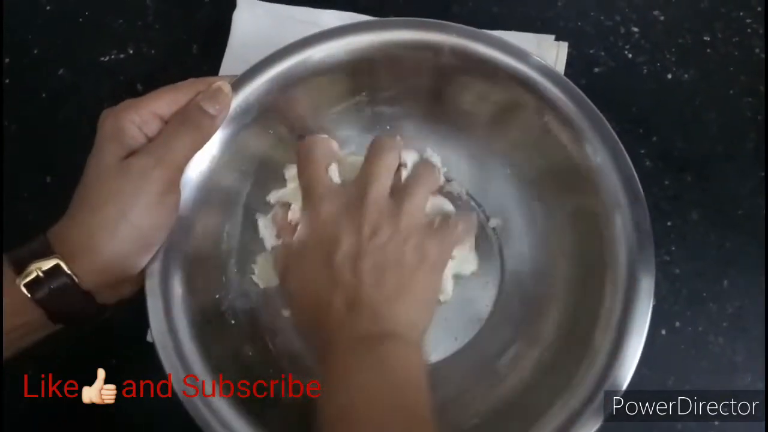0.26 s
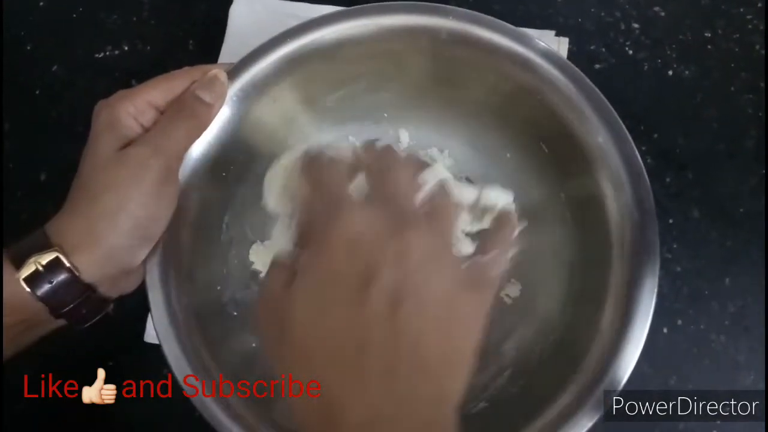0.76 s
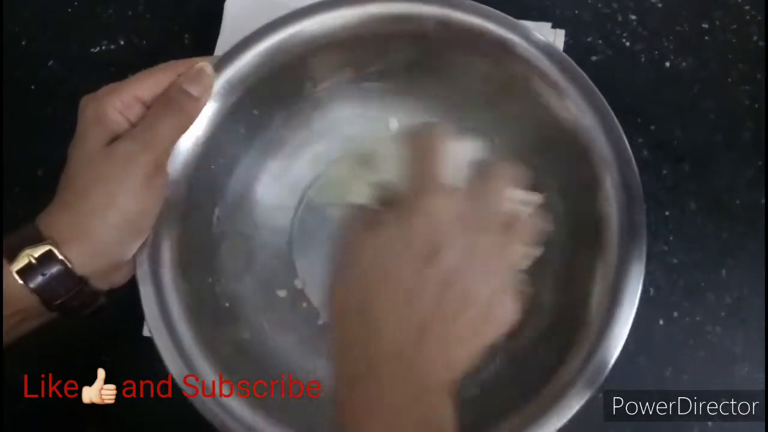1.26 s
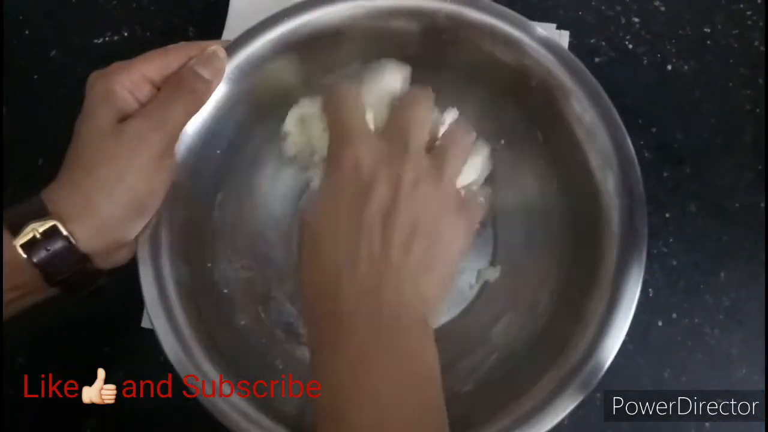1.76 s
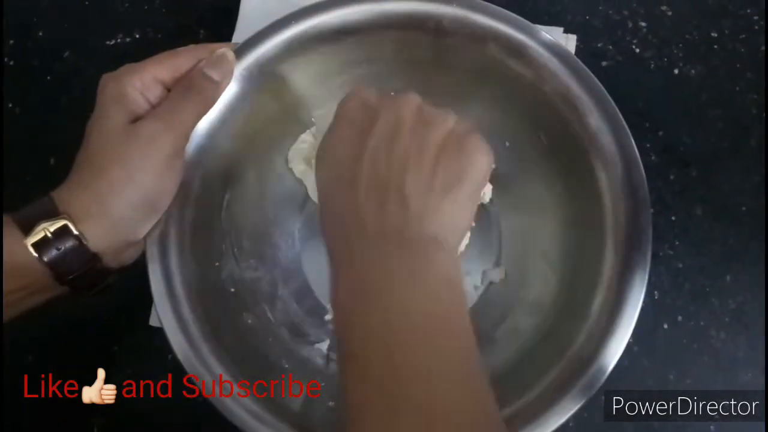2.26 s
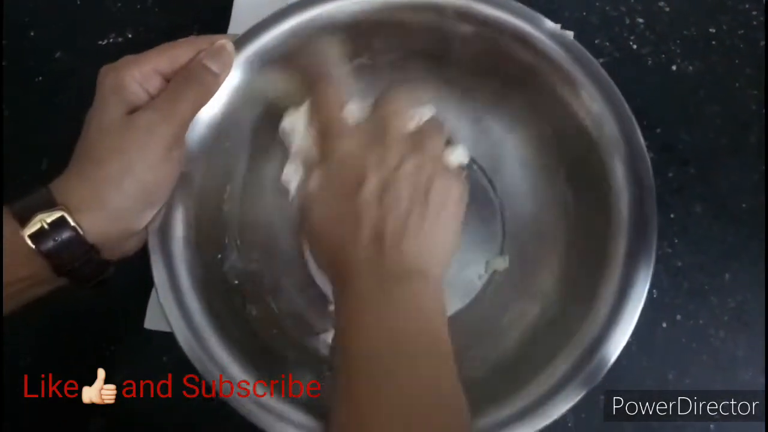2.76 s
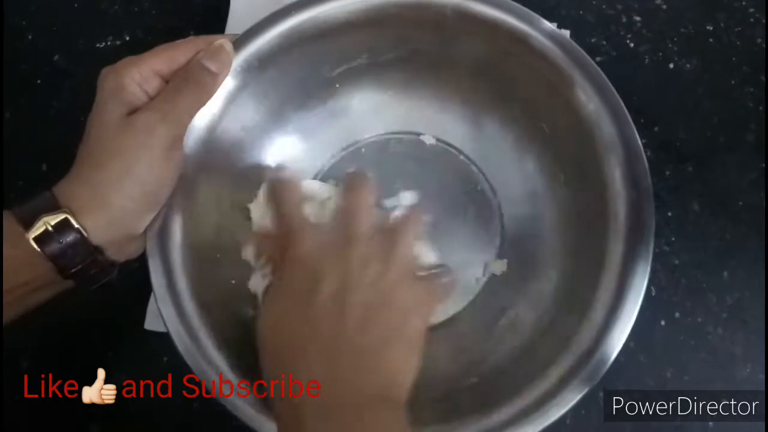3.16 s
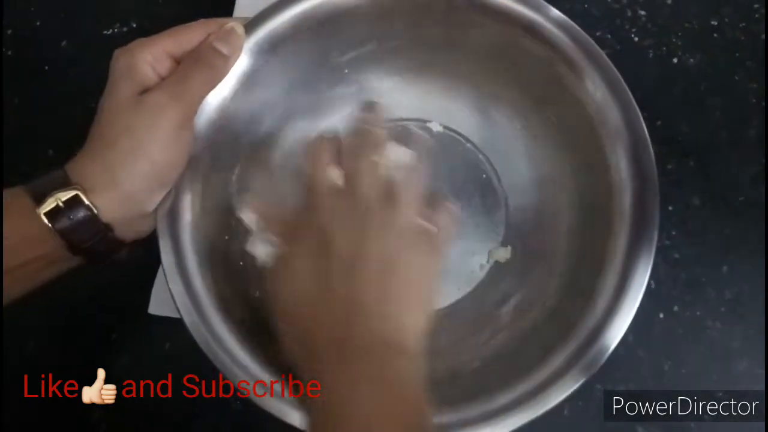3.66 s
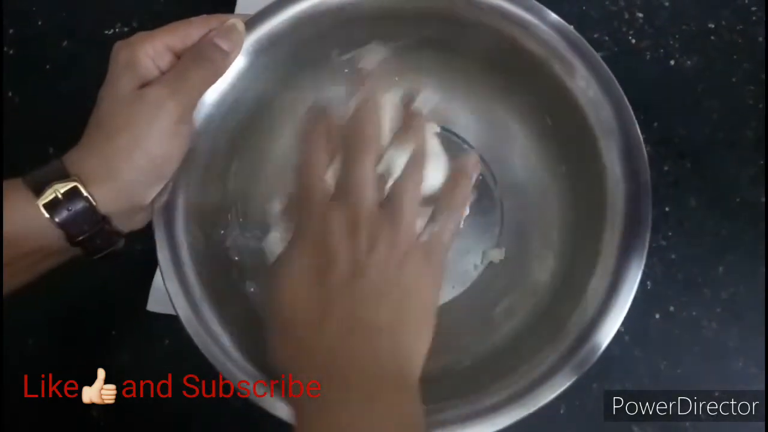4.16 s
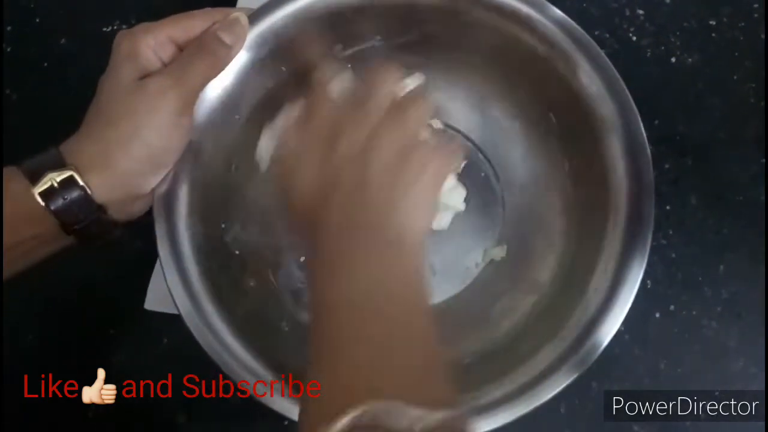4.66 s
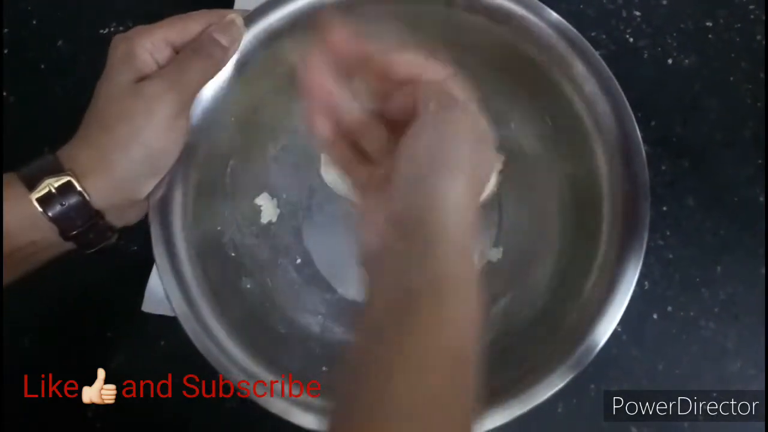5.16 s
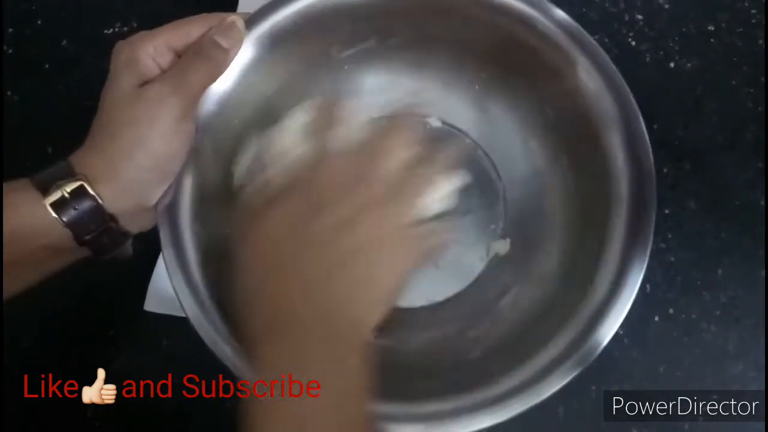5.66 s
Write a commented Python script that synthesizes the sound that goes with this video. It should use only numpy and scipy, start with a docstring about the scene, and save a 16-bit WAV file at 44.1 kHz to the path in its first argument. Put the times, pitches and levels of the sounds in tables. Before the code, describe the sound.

Hands knead sticky dough in a wide steel bowl, with soft rubbing, dull thumps, sticky snaps and hollow metallic knocks in a quiet kitchen.

```python
"""Kneading dough in a steel bowl

Small, quiet kitchen, microphone with two ports close above a wide steel bowl held on a cloth on a counter.
Skin, dough and flour rub as shaped noise; sticky dough snaps and peels in short pops, and skids chirp as sines.
The lump lands with sagging low booms; full and narrow-band knocks are short chatter through the bowl's resonances.
The rim and floor of the bowl ring in decaying modes, and the room adds a short tail, a low hum and a hush."""
import sys
import numpy as np
from scipy import signal
from scipy.fft import rfft, irfft, next_fast_len
from scipy.io import wavfile
from scipy.ndimage import uniform_filter1d

SR = 44100
rng = np.random.default_rng(int(sys.argv[2]) if len(sys.argv) > 2 else 0)


def unload_audio(sound):
    """Save the sound as a 16-bit wav file, at the path given as the first command line argument."""
    columns = np.transpose(np.atleast_2d(sound))
    # keep every value between -1 and 1, then stretch to whole-number steps
    steps = np.round(np.clip(columns, -1, 1) * 32767)
    wavfile.write(sys.argv[1], SR, steps.astype(np.int16))


N = 260190
TIME = np.arange(N) / SR
STEPS = TIME[::32]  # the hand's gestures are drawn at this coarser rate

# Strokes of the hand over the bowl; rise and fade each span 20 dB, levels are before the mix of the rubs:
# peak_s, rise_s, fade_s, skin_on_steel_db, dough_against_skin_db, flour_against_skin_db
HAND_STROKES = [(0, .05, 0.089, -47.5, -11, -28), (0.209, 0.018, 0.28, -62.5, -5.5, -14),
                (0.346, 0.075, 0.16, -44, -9.5, -38), (.5, 0.35, 0.35, -46, -39, -27.5),
                (0.658, 0.086, 0.2, -39.5, -7, -20.5), (.865, 0.025, 0.13, -51.5, -15, -45),
                (1.075, 0.082, 0.3, -41, -2.5, -33), (1.304, 0.12, 0.0099, -43, -16, -22),
                (1.582, 0.23, 0.38, -37.5, -5.5, -21), (1.725, 0.052, 0.043, -43, 6, -40),
                (1.815, 0.05, 0.056, -42, -13, -28), (1.945, 0.088, 0.048, -48.5, -13, -16),
                (2.266, 0.015, 0.065, -44.5, -9.5, -31), (2.452, 0.063, 0.058, -51, -13, -24),
                (2.636, 0.03, 0.21, -43.5, -9.5, -16.5), (2.85, 0.28, 1, -48.5, -24, -26),
                (3.013, 0.05, 0.088, -39, -7, -16.5), (3.167, 0.0068, .15, -73, -30, -33.5),
                (3.427, 0.046, 0.097, -46.5, 2, -20), (3.529, 0.031, 0.12, -45.5, -12, -20.5),
                (3.615, 0.072, 0.28, -53, -1, -43), (3.83, 0.097, 0.49, -47, -8, -20),
                (4.104, 0.063, 0.17, -40.5, -7.5, -17.5), (4.189, 0.019, 0.081, -40, -4, -20.5),
                (4.539, 0.0089, 0.076, -50.5, -19, -34), (4.649, 0.063, 0.15, -47.5, -2.5, -21),
                (4.792, 0.082, 0.083, -39.5, -7, -20), (4.92, 0.043, 0.039, -35.5, -9.5, -23),
                (5.071, 0.053, 0.054, -54, -23, -23), (5.283, 0.0088, 0.14, -46.5, -13, -29),
                (5.49, 0.04, 0.068, -56.5, -45, -34), (5.70, 0.045, 0.51, -42.5, -4, -18.5),
                (5.815, 0.043, 0.058, -28, -5, -23.5)]
# Fingertips and sticky dough snap on the steel: start_s, level_db, pitch_hz, length_s
STICKY_TICKS = [(0.213, -45, 4470, 0.00013), (0.238, -43.5, 4100, 0.00064), (0.627, -26.5, 3970, 0.00066),
                (0.633, -29, 3970, 0.0016), (0.84, -40.5, 4070, 0.0014), (0.877, -36, 4260, 0.0024),
                (0.89, -35, 3770, 0.0024), (1.034, -21, 3700, .001), (1.598, -27, 4100, 0.00092),
                (2.007, -32.5, 3790, 0.0046), (2.635, -32, 3800, 0.00066), (2.64, -32, 4530, 0.002),
                (2.646, -28, 4380, 0.0018), (3, -40, 4630, .002), (3.162, -26.5, 4390, 0.0018),
                (3.425, -29, 4130, 0.00086), (3.518, -36.5, 3950, 0.0014), (3.81, -49, 4200, .001),
                (4.534, -39.5, 3430, 0.0014), (4.629, -27, 4360, 0.0026), (4.647, -20, 4090, 0.001),
                (4.651, -24, 4360, 0.0015), (4.912, -28, 4040, 0.00099), (5.084, -39, 4000, 0.00056),
                (5.678, -27, 4520, 0.00023), (5.683, -14, 4170, 0.00071)]
# Sticky dough peels off the steel in a crackle, level before the bowl's resonances:
# hardest_pull_s, rise_s, fade_s, level_db, middle_grain_pitch_hz
DOUGH_PEELS = [(0.339, 0.025, 0.16, -45, 2470), (.39, 0.058, 0.035, -59, 1540),
               (.66, 0.042, 0.056, -48.5, 1450), (1.075, 0.045, 0.074, -36, 2350),
               (1.1, 0.061, 0.2, -49.5, 924), (1.18, 0.047, 0.06, -48, 1840),
               (1.491, 0.035, 0.15, -57, 2010), (1.734, .04, 0.05, -43, 785),
               (1.81, 0.046, 0.092, -52, 1820), (2.699, .03, 0.13, -50, 2430),
               (2.899, 0.11, 0.13, -56.5, 1550), (3.305, .04, 0.14, -44, 724),
               (3.31, 0.038, 0.18, -48, 1970), (3.43, .03, 0.088, -56.5, 590),
               (3.605, 0.028, 0.051, -57, 670), (3.829, 0.053, 0.09, -50, 553),
               (4.29, 0.028, 0.08, -54, 577), (5.349, .05, 0.04, -62.5, 646)]
# A finger skids and the steel chirps: loudest_s, peak_db, pitch_hz, bell_spread_s (standard deviation)
SKID_CHIRPS = [(0.364, -51, 874, 0.0043), (0.605, -48, 885, 0.0052), (0.641, -48, 905, 0.014),
               (2.649, -58, 1655, 0.0093), (4.795, -59, 855, 0.016), (5.691, -52, 4270, 0.0017),
               (5.695, -42.5, 813, 0.013), (5.721, -32.5, 4070, 0.0034), (5.735, -36, 3760, .004),
               (5.807, -25, 3860, 0.0029), (5.81, -15.5, 4210, 0.0007), (5.8177, -17, 4240, 0.0013)]
# The lump lands or is punched down, then rolls on under the hand; rumble before ROLL_DB, sign of the fade ignored:
# start_s, peak_db, middle_pitch_hz, time_to_peak_s, rumble_db, rumble_fade_by_20_db_s
LUMP_THUMPS = [(0.515, -57, 144, .014, -70.5, -0.5), (0.59, -52.5, 131, 0.012, -91, 6),
               (1.029, -41.5, 153, 0.0053, -58.5, 0.75), (1.462, -44, 137, 0.0086, -56, 0.47),
               (1.494, -46, 160, 0.0096, -68, -0.3), (1.549, -48, 150, 0.0083, -77, -0.3),
               (1.735, -49, 136, 0.0049, -73, 1), (1.928, -43.5, 105, 0.008, -50, 0.16),
               (2.259, -36, 144, 0.0088, -47.5, 0.32), (2.72, -49.5, 127, .01, -56, 0.1),
               (3.013, -53, 138, 0.0069, -52, 0), (3.295, -49, 185, 0.009, -56.5, 0.6),
               (4.128, -58, 162, 0.01, -69, .1), (4.248, -38, 200, 0.0061, -51, 0.15),
               (4.641, -33, 148, 0.0051, -42, 0.03), (4.668, -41, 166, .009, -45, -0.02),
               (4.695, -40, 191, 0.0098, -58, -0.9), (4.792, -47.5, 146, 0.012, -68, -0.5),
               (4.92, -39, 130.4, 0.0063, -50, -0.4), (5.279, -29, 123, 0.0087, -43.5, 0.32),
               (5.673, -42.5, 156, 0.01, -65.5, 2)]
# Narrow-band knocks, alone or together with a bowl knock: time_s, strength_db, middle_pitch_hz, contact_s
NARROW_KNOCKS = [(.659, -3, 1140, 0.0022), (0.84, -9, 1200, 0.0038), (.858, -2, 1100, 0.00087),
                 (1.144, 4.5, 1460, 0.0034), (1.174, 11, 1880, 0.0015), (1.442, 14, 1520, 0.0023),
                 (1.709, 9, 800, 0.0016), (1.74, 7, 910, 0.0057), (1.937, 6, 1450, 0.0025),
                 (2.692, 2.5, 755, 0.0024), (2.78, 1.5, 1070, 0.0015), (2.890, 1, 1500, .0012),
                 (2.921, -0.5, 960, .0012), (3.0163, 12.5, 900, 0.0015), (3.576, 7, 780, 0.0016),
                 (4.131, 12.5, 960, 0.0078), (4.2514, 11, 730, 0.0011), (4.63, 6, 910, 0.0019),
                 (4.926, 2, 1650, 0.0032), (5.671, -2, 770, 0.005), (5.682, 3.5, 765, 0.0052),
                 (5.817, 4, 1020, 0.0034)]
# The bowl knocks on the counter: time_s, strength_db, brightness_db_per_octave, weight_behind_db, contact_s
BOWL_KNOCKS = [(1.035, 5.5, 2.5, 0.5, 0.0029), (1.304, -5.5, 1, -14, 0.0028), (1.442, -8, 2.5, -9, 0.0049),
               (1.5966, 4, -0.3, -9.5, 0.0034), (1.684, -0.5, 2.5, -5, 0.0037),
               (1.708, 5.5, -5, -20, 0.0018), (1.717, -1, 0, -13, 0.0011), (1.739, 1, -2.5, -25, 0.0029),
               (1.751, -7, -3, -23, 0.0017), (1.935, 2, 0.5, 3, 0.0044), (2.2555, -19, -0.5, -18, 0.02),
               (3.2574, 13, -1, -11.5, 0.0027), (3.271, -17, 1, -21, 0.0013),
               (3.292, -9, -5, -1.5, 0.00075), (3.314, -14, -1, -8, 0.0019), (3.576, -2, -1.5, -16, 0.0029),
               (3.635, -9, -1, -4.5, 0.0035), (3.757, 0, 0, -7.5, 0.0022), (3.819, -14, 1.5, -6, 0.0032),
               (4.131, -12, -4.5, -6, 0.004), (4.2513, 6.5, -1, -3, 0.0043), (4.267, -3.5, -2, -8, 0.0018),
               (4.534, -19, 3.5, -21, 0.002), (4.63, -5.5, -2.5, -11.5, 0.0016),
               (4.648, 1, -0.5, -12, 0.0074), (4.91, -12.5, -3.5, 9.5, 0.003), (4.922, -2.5, 1, 1, 0.0029),
               (5.275, -18.5, -12, -6, .0025), (5.670, -7.5, -4.5, 7, 0.0035), (5.685, -2, -0.5, 2, 0.0045)]
# The hand's weight flexes the bowl's floor with a hollow clunk: start_s, peak_db, pitch_hz, time_to_peak_s
FLOOR_CLUNKS = [(1.439, -31.5, 346, 0.0036), (1.458, -44.5, 325, 0.011), (1.595, -32, 452, 0.0024),
                (1.932, -31.5, 374, 0.0034), (2.252, -53.5, 618, .007), (2.282, -49.5, 315, .013),
                (3.015, -40.5, 423, 0.003), (4.2498, -27, 373, 0.0029), (4.672, -42.5, 290, 0.012),
                (4.908, -35.5, 399, 0.003), (5.272, -47, 325, 0.0054), (5.274, -49, 633, 0.0069)]
# Broad resonances and dips of the damped bowl: centre_hz, width_hz, gain_db
BOWL_BODY = [(267, 69, -4.5), (342, 97, 5), (405, 34, 4), (730, 180, -1), (855, 112, 4), (1100, 68, -2.5),
             (1309, 21, 6), (1587, 41, 7.5), (2292, 237, 4.5), (3054, 73, 2.5), (4230, 970, 5)]
# Modes of the floor of the bowl: pitch_hz, relative_db, t60_s
BOWL_FLOOR_MODES = [(107, -9, .4), (198, -14, 0.35), (323, -16, 0.22), (433, -16, .2), (478, -19, .2),
                    (537, -12, .25), (618, -14, .25), (679, -14, .25), (739, -11, .22), (822, -12, .25),
                    (885, -17, .2), (980, -19, .18), (1555, -16, .13), (2330, -21, .12), (2460, -15, .15)]
# Thin modes of the free rim: pitch_hz, relative_db, t60_s
RIM_MODES = [(2326, -26, 1.2), (2487, -23, 1.2), (2630, -15, 2.4), (2676, -15, 2.4), (2864, -19, 1.8),
             (3155, -21, .8), (3311, -24, 1.2), (3714, -21, 1.1), (3785, -21, .9), (3990, -19, 1.3),
             (4081, -21, 1.2), (4164, -20, .8), (4375, -23, .9), (4432, -18, .9), (4560, -25, .8),
             (4710, -23, 1.2), (4860, -24, 1), (5204, -23, .6)]
# Spectrum of skin sliding on steel: frequency_hz, relative_density_db (per Hz)
SKIN_SPECTRUM = [(300, -48.5), (900, -33), (1900, -31), (2450, -4.5), (3100, -2.5), (3800, 2), (4450, 2),
                 (5100, -1.5), (6200, -11), (7500, -25), (9000, -51), (12000, -52)]
# Spectrum of dough dragging on steel: frequency_hz, relative_density_db (per Hz)
DOUGH_SPECTRUM = [(40, -36), (120, -22.5), (300, -0.5), (550, -6.5), (850, 0), (1200, -2.5), (1800, 0),
                  (2700, 5.5), (4000, -4), (7000, -41), (12000, -61)]
# Spectrum of flour hissing: frequency_hz, relative_density_db (per Hz)
FLOUR_SPECTRUM = [(4000, -20.5), (6000, 15), (7500, 8.5), (8800, -2.5), (10500, -4), (13000, -2),
                  (15500, -4)]
# Spectrum of the rumble under the hand's weight: frequency_hz, relative_density_db (per Hz)
RUMBLE_SPECTRUM = [(25, -13), (50, -9), (75, 1), (110, 1.5), (160, 2.5), (230, 1), (380, -15.5),
                   (600, -28.5), (1500, -60)]
# Spectrum shared by every full and narrow-band knock: frequency_hz, relative_density_db (per Hz)
KNOCK_SPECTRUM = [(30, -17), (150, -16.5), (300, 4), (420, 1.5), (820, -1.5), (1120, -3.5), (2050, -8.5),
                  (2500, -1), (3200, -4.5), (4000, 0), (4900, -10), (7500, -29), (12000, -62)]
# Spectrum of the room's hush: frequency_hz, relative_density_db (per Hz)
HUSH_SPECTRUM = [(20, -9), (50, -2.5), (110, 8.5), (220, -4.5), (390, -1.5), (550, -12), (1000, -13.5),
                 (2000, -54), (4000, -8.5), (7000, -36), (15000, -27.5)]
# Decay of the kitchen: frequency_hz, t60_s
KITCHEN_T60 = [(100, .65), (250, .45), (600, .48), (1500, .4), (4000, .5), (12000, .45)]
# Level of the kitchen's tail: frequency_hz, reverberation_against_direct_db
KITCHEN_LEVEL = [(60, -15), (110, -10), (195, -0.5), (320, -3.5), (600, -4.5), (800, -4.5), (1600, -4.5),
                 (2400, -6.5), (4000, -10.5), (12000, -6)]
# Low standing waves of the kitchen: pitch_hz, gain_db, time_to_peak_s
STANDING_MODES = [(107.3, 2.5, 0.02), (144, 1.5, 0.062), (200, 5, 0.027), (365, -1.5, 0.053)]
# Balance of the two microphone ports: frequency_hz, left_minus_right_db
PORT_BALANCE = [(60, 5.5), (200, 3), (380, 1.5), (700, 2), (1600, 3.5), (2300, 13), (4400, 7), (8100, 3),
                (13000, -5)]
# Likeness of diffuse sound at the two ports: frequency_hz, correlation (1 = the same, 0 = unrelated)
PORT_LIKENESS = [(25, 0.7), (60, 0.91), (250, 0.58), (600, 0.61), (1200, 0.27), (2400, -0.054),
                 (15000, -0.08)]

HUSH_DB, RIM_DB, EDGE_HZ = -69, -51, 15550  # the edge is the recorder's upper band limit
REST_SLIDE_DB, REST_DRAG_DB = -69.5, -77.5  # the faint rub of hands that never leave the bowl
LINGER_DB, LINGER_PEAK_S, LINGER_RISE_S, LINGER_FADE_S = -59.5, 0.0056, 0.12, 0.16  # noisy tail of each knock
LINGER_DRAG_DB = -16  # the dull part of that tail against its bright part
FADE_POWER = 1.02  # a slowing hand dies away ever faster
FLOUR_POWER = 1.7  # the hiss of flour needs speed, so it follows the stroke more steeply
PATCH_DB, GRIP_DB = 2.9, 1.6  # how far the rub's colour shifts, and how far the skin grips and lets go
ROLL_PEAK_S, ROLL_RISE_S, ROLL_DB = 0.028, 0.034, -5.5  # the rumble peaks just after each thump
LEAN_DB = -27  # rumble of the hand's weight against the rub of its stroke, before ROLL_DB
GRAINS_PER_S, GRAIN_CYCLES, GRAIN_OCTAVES, GRAIN_SPREAD_DB = 300, 2.2, .6, 3.5
BELOW_DB_PER_OCTAVE, ABOVE_DB_PER_OCTAVE = 14, 14.5  # slopes of a narrow-band knock
TILT_HZ = 1000  # the brightness of a knock tilts its spectrum about this pitch
WEIGHT_HZ = 358  # the weight behind a knock lifts or thins the bass below this
LEAD_S = .0007  # time in which the chatter of a blow builds up
UNEVEN_DB = 2.8  # random unevenness in the spectrum of each blow
RING_DB = -43  # how strongly a blow rings the floor modes
SOFT_HZ = 252  # the soft lump rings mostly the floor modes below this


def amp(db):
    """Decibels to an amplitude factor."""
    return 10 ** (np.asarray(db) / 20)


def unit(x):
    """Scales x to an RMS of 1."""
    return x / np.sqrt(np.mean(x ** 2) + 1e-20)


def read(points, hz):
    """A table joined by straight lines on a log-frequency axis."""
    f, value = np.transpose(points)
    return np.interp(np.log(hz + 1), np.log(f + 1), value)


def bins(size):
    """Frequencies in Hz of a real spectrum."""
    return np.fft.rfftfreq(size, 1 / SR)


def add(mix, s, sound):
    """Lays a sound into the mix from time s, cut at the end."""
    part = mix[..., max(round(s * SR), 0):][..., :sound.shape[-1]]
    part += sound[..., :part.shape[-1]]


def colour(x, spectrum):
    """Filters x by a spectrum table."""
    size = x.shape[-1]
    return irfft(rfft(x) * amp(read(spectrum, bins(size))), size)


def faded(x):
    """Lets the second half of a response die smoothly to nothing."""
    return x * np.sin(np.pi / 2 * np.minimum(np.linspace(2, 0, len(x)), 1)) ** 2


def causal(db):
    """The minimum-phase impulse response for the given gain per bin, faded out."""
    log_gain = np.log(amp(np.concatenate([db, db[-2:0:-1]])))
    spectrum = np.exp(np.conj(signal.hilbert(log_gain)))
    return faded(irfft(spectrum[:len(db)]))


def body_db(hz):
    """The bowl's broad resonances and dips as bumps on a level spectrum."""
    bumps = sum(db / (1 + (2 * (hz - f) / width) ** 2) for f, width, db in BOWL_BODY)
    return bumps - 2.0


def ports(pair):
    """Two unrelated signals become one diffuse sound: alike in the bass, unrelated in the treble."""
    size = next_fast_len(pair.shape[-1], True)
    a, b = rfft(pair, size)
    same = np.clip(read(PORT_LIKENESS, bins(size)), -1, 1)
    right = same * a + np.sqrt(1 - same ** 2) * b
    return irfft(np.array([a, right]), size)[:, :pair.shape[-1]]


def wander(rate_hz):
    """A slow random drift of unit RMS."""
    return unit(np.interp(TIME * rate_hz, np.arange(N // 100), rng.standard_normal(N // 100)))


def swell(s, rise_s, fade_s):
    """A bell-shaped rise to 1 at time s, then a fade; each spans 20 dB."""
    t = STEPS - s
    steps_of_20_db = np.where(t < 0, (t / rise_s) ** 2, abs(t / fade_s) ** FADE_POWER)
    return amp(-20 * np.minimum(steps_of_20_db, 10))


def follow(gesture):
    """A gesture's level at every sample."""
    return np.interp(TIME, STEPS, gesture)


def friction(spectrum, slips_per_s, spread_db, smooth, uneven_db):
    """Many tiny slips of uneven size over a smooth hiss, sounding through the bowl."""
    slips = (rng.random(N) < slips_per_s / SR) * amp(spread_db * np.minimum(rng.exponential(1, N), 3))
    drive = rng.standard_normal((2, N)) * (unit(slips) + smooth) * amp(uneven_db * wander(45))
    hz = bins(2048)
    wall = causal(read(spectrum, hz) + body_db(hz))
    return unit(ports(signal.oaconvolve(drive, wall[None], axes=1)[:, :N]))


def patchy(x, size=512):
    """Random patches in time and frequency keep shifting the colour of the rubbing."""
    z = signal.stft(x, nperseg=size)[2]
    patches = rng.standard_normal(z.shape[1:])
    patches = uniform_filter1d(patches, size=4, axis=0)
    patches = unit(uniform_filter1d(patches, size=4, axis=1))
    return signal.istft(z * amp(PATCH_DB * patches), nperseg=size)[1][:, :N]


def strokes():
    """Skin slides brightly, dough drags in coarser slips, flour hisses; a short noisy tail follows each knock."""
    linger = sum(amp(db + LINGER_DB) * swell(s + LINGER_PEAK_S, LINGER_RISE_S, LINGER_FADE_S) * (STEPS > s)
                 for s, db, *_ in BOWL_KNOCKS)
    slide = linger + amp(REST_SLIDE_DB)
    drag = amp(LINGER_DRAG_DB) * linger + amp(REST_DRAG_DB)
    flour = 0
    for s, rise_s, fade_s, db, dough_db, flour_db in HAND_STROKES:
        speed = swell(s, rise_s, fade_s)
        slide = np.hypot(slide, amp(db) * speed)
        drag = np.hypot(drag, amp(db + dough_db) * speed)
        flour = np.hypot(flour, amp(db + flour_db) * speed ** FLOUR_POWER)
    skin = friction(SKIN_SPECTRUM, slips_per_s=3000, spread_db=2.5, smooth=1.0, uneven_db=GRIP_DB)
    dough = friction(DOUGH_SPECTRUM, slips_per_s=340, spread_db=1.5, smooth=1.0, uneven_db=4.0)
    dust = friction(FLOUR_SPECTRUM, slips_per_s=3500, spread_db=2.5, smooth=0.72, uneven_db=0.5)
    rub = amp(-1.0) * follow(slide) * skin
    rub += amp(-3.0) * follow(drag) * dough
    rub += amp(4.0) * follow(flour) * dust
    return patchy(rub)


def push():
    """The lump rolls under the hand after each thump, and lightly in each stroke, and the bowl rumbles."""
    rumble = unit(colour(ports(rng.standard_normal((2, N))), RUMBLE_SPECTRUM))
    roll = sum(amp(db) * swell(s + ROLL_PEAK_S, ROLL_RISE_S, fade_s) for s, *_, db, fade_s in LUMP_THUMPS)
    lean = sum(amp(db + LEAN_DB) * swell(s, rise_s, fade_s) for s, rise_s, fade_s, db, *_ in HAND_STROKES)
    return amp(ROLL_DB) * follow(np.hypot(roll, lean)) * rumble


def room_hush():
    """The quiet kitchen's steady noise, diffuse at the two ports."""
    return amp(HUSH_DB) * unit(colour(ports(rng.standard_normal((2, N))), HUSH_SPECTRUM))


def ticks(scatter=0.44, scatter_s=0.0074, width_hz=900):
    """A snap rings the wall briefly; the waves then scatter around the bowl."""
    out, t = np.zeros((2, N)), np.arange(SR // 20) / SR
    for s, db, hz, length in STICKY_TICKS:
        u = 2 * t / length
        snap = u * np.exp(1 - u) * np.sin(2 * np.pi * hz * t)
        band = 1 / (1 + (2 * (bins(len(t)) - hz) / width_hz) ** 2)
        waves = unit(irfft(rfft(rng.standard_normal((2, len(t)))) * band, len(t)))
        scattered = scatter * waves * (1 - np.exp(-u)) * np.exp(-t / scatter_s)
        add(out, s, amp(db) * (0.83 * snap + scattered))
    return out


def peels(count=200):
    """Threads of dough let go one by one: tiny pops of their own pitch and size, through the bowl."""
    out, t = np.zeros((2, N)), np.arange(SR // 30) / SR
    for s, rise_s, fade_s, db, middle_hz in DOUGH_PEELS:
        times = s - rise_s + (np.arange(count) + 2 * rng.random(count)) / GRAINS_PER_S
        pull = np.interp(times, STEPS, swell(s, rise_s, fade_s))
        sizes = unit(amp(GRAIN_SPREAD_DB * np.minimum(rng.exponential(1, count), 3)))
        sizes = sizes * amp(db) * pull * np.sqrt(SR / GRAINS_PER_S)
        pitches = middle_hz * 2 ** (GRAIN_OCTAVES * np.clip(rng.standard_normal(count), -1.5, 1.5))
        for at, size, hz, phase in zip(times, sizes, pitches, rng.random((count, 2, 1))):
            u = 2 * hz * t / GRAIN_CYCLES
            pop = u ** 2 * np.exp(-u) * np.sin(2 * np.pi * (hz * t + phase))
            add(out, at, size * pop / np.linalg.norm(pop[0]))
    wall = causal(body_db(bins(2048)))
    return ports(signal.oaconvolve(out, wall[None], axes=1)[:, :N])


def chirps():
    """Stick and slip lock on to the wall's resonance briefly: a sine under a bell."""
    out = np.zeros(N)
    for s, db, hz, spread_s in SKID_CHIRPS:
        bell = np.exp(-.5 * ((TIME - s) / spread_s) ** 2)
        out += amp(db) * bell * np.sin(2 * np.pi * hz * (TIME - s))
    return out


def boom(db, hz, peak_s, sag=0):
    """A soft push: a few cycles that swell and die, falling in pitch by the share sag around hz."""
    t = TIME[:SR // 5]
    u = t / peak_s
    turns = np.cumsum(hz * (1 + sag * (np.exp(-u / 2) - .5))) / SR
    return amp(db) * (u * np.exp(1 - u)) ** 2 * np.sin(2 * np.pi * turns)


def thumps(sag=0.44, touch_s=0.0052, ring_db=-5):
    """The soft lump touches, ringing the bowl's floor, then pushes it: a short boom that sags in pitch."""
    out, t = np.zeros(N), np.arange(SR // 2) / SR
    floor = sum(amp(db - 60 * t / t60) * np.sin(2 * np.pi * hz * t) / (1 + (hz / SOFT_HZ) ** 3)
                for hz, db, t60 in BOWL_FLOOR_MODES)
    floor *= 1 - np.exp(-t / 0.0012)  # soft onset
    for s, db, hz, peak_s, *_ in LUMP_THUMPS:
        add(out, s - touch_s, amp(db + ring_db) * floor)
        add(out, s, boom(db, hz, peak_s, sag))
    return out


def ring(x):
    """Each blow rings the bowl's floor modes with random weights, slight detuning and random phase."""
    t = np.arange(SR // 3) / SR
    draws = rng.uniform(-1.1, 1, (len(BOWL_FLOOR_MODES), 3))
    modes = 0
    for (hz, db, t60), (weight, detune, phase) in zip(BOWL_FLOOR_MODES, draws):
        turn = 2 * np.pi * hz * (1 + 0.0048 * detune) * t + np.pi * phase
        modes = modes + (1 + weight) * amp(db - 60 * t / t60) * np.cos(turn)
    return signal.fftconvolve(x, ((t == 0) + amp(RING_DB) * modes)[None], axes=1)


def blow(shape_db, contact_s, spread_s=0.001077, spread_hz=4000, hard_s=0.0025, size=2048):
    """A push inside chatter: the longer the contact, the softer the push. Returns (lead-in s, sound)."""
    hz, t = bins(size), (np.arange(size) - size // 4) / SR
    spread = np.exp(-1j * np.pi * spread_s * hz ** 2 / spread_hz)  # the treble arrives slightly after the bass
    uneven = unit(np.convolve(rng.standard_normal(len(hz)), np.hanning(size // 128), "same"))
    uneven *= UNEVEN_DB * np.minimum(hz / 1000, 1)
    margin = size // 16  # room for the soft start of the response
    response = irfft(rfft(causal(shape_db + body_db(hz) + uneven), size) * spread)
    response = faded(np.roll(response, margin))
    chatter = ports(rng.standard_normal((2, size))) * np.exp(-np.maximum(t / contact_s, -t / LEAD_S))
    chatter /= np.linalg.norm(chatter, axis=1, keepdims=True)
    hardness = np.exp(-contact_s / hard_s) ** 2
    z = rfft(chatter * np.sqrt(1 - hardness) + np.sqrt(hardness) * (t == 0))
    force = unit(irfft(z / np.sqrt(abs(z) ** 2 + .5))) / np.sqrt(size)  # the force has little colour of its own
    return margin / SR - t[0], ring(signal.fftconvolve(force, response[None], axes=1))


def narrow_knocks(size=2048):
    """Narrow-band knocks around a middle pitch, alone or together with a bowl knock."""
    out, hz = np.zeros((2, N)), bins(size)
    for s, db, middle_hz, contact_s in NARROW_KNOCKS:
        octaves = np.log2(np.maximum(hz, 100) / middle_hz)
        away_db = np.maximum(-BELOW_DB_PER_OCTAVE * octaves, ABOVE_DB_PER_OCTAVE * octaves)
        lead, sound = blow(db + read(KNOCK_SPECTRUM, hz) - away_db, contact_s)
        add(out, s - lead, sound)
    return out


def knocks(size=2048):
    """The bowl rocks on to the counter: one shared spectrum, tilted in brightness, deeper with weight behind."""
    out, hz = np.zeros((2, N)), bins(size)
    octaves = np.log2(np.clip(hz, 300, 4500) / TILT_HZ)
    bass = 1 / np.sqrt(1 + (hz / WEIGHT_HZ) ** 4)
    for s, db, tilt, weight_db, contact_s in BOWL_KNOCKS:
        shape_db = db + read(KNOCK_SPECTRUM, hz) + tilt * octaves + weight_db * bass
        lead, sound = blow(shape_db, contact_s)
        add(out, s - lead, sound)
    return out


def clunks():
    """The bowl's floor gives under the hand: a hollow boom with its own note each time."""
    out = np.zeros(N)
    for s, db, hz, peak_s in FLOOR_CLUNKS:
        add(out, s, boom(db, hz, peak_s))
    return out


def rim(x):
    """The free rim sings on faintly after every touch."""
    t = np.arange(SR) / SR
    rings = 0
    for hz, db, t60 in RIM_MODES:
        tone = np.sin(2 * np.pi * (hz * t + rng.random((2, 1))))
        rings = rings + amp(db - 60 * t / t60) * tone / np.sqrt(t60)
    return amp(RIM_DB) * signal.fftconvolve(x, rings, axes=1)[:, :N]


def kitchen(x, build_s=0.0019, trade_hz=0.6922):
    """Dense reflections die band by band; two random tails trade places slowly, so no fixed colour stands out."""
    out = np.zeros((2, N))
    turn = 2 * np.pi * trade_hz * TIME
    for share in np.cos(turn), np.sin(turn):
        hz, t, z = signal.stft(ports(rng.standard_normal((2, SR))), SR, nperseg=512)
        t60 = read(KITCHEN_T60, hz)[:, None]
        energy_scale = np.sqrt(2 * np.log(1000) / (t60 * SR))  # the level does not depend on t60
        z *= amp(read(KITCHEN_LEVEL, hz)[:, None] - 60 * t / t60) * energy_scale
        tail = signal.istft(z, SR, nperseg=512)[1][:, :SR]
        tail = tail * (1 - np.exp(-(TIME[:SR] / build_s) ** 2))  # quick build-up
        out += signal.fftconvolve(x * share, tail, axes=1)[:, :N]
    return out


def standing_waves(x):
    """The room's low modes take up the bowl's sound slowly and hum on after it."""
    t = TIME[:SR]
    hum = sum(amp(db) * 2 * t / peak_s ** 2 * np.exp(-t / peak_s) * np.sin(2 * np.pi * hz * t)
              for hz, db, peak_s in STANDING_MODES) / SR
    return signal.fftconvolve(x, hum[None], axes=1)[:, :N]


def scene():
    """The bowl and its ring in the room over the hush, with the balance of the two microphone ports."""
    bowl = strokes() + push() + ticks() + peels() + chirps() + thumps() + narrow_knocks() + knocks() + clunks()
    bowl = bowl + rim(bowl)
    air = bowl + kitchen(bowl) + standing_waves(bowl) + room_hush()
    left = amp(read(PORT_BALANCE, bins(N)))
    gains = np.array([left, np.ones_like(left)]) / np.sqrt((1 + left ** 2) / 2)
    return irfft(rfft(air) * gains, N)


def record(dry):
    """The recorder's band limit."""
    low_pass = signal.firwin(511, EDGE_HZ, window=("kaiser", 9), fs=SR)
    return signal.oaconvolve(dry, low_pass[None], "same")


dry = scene()
out = record(dry)
unload_audio(out)
```